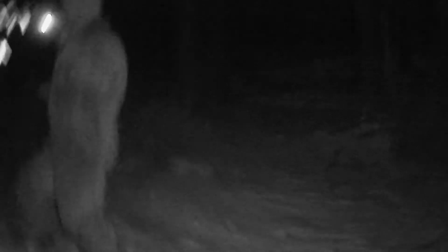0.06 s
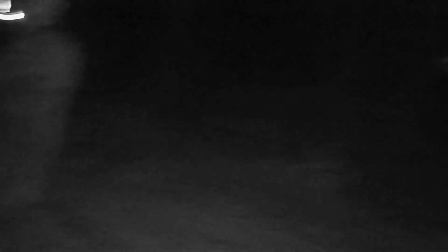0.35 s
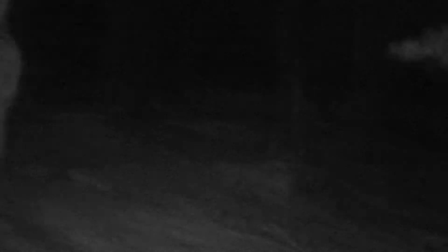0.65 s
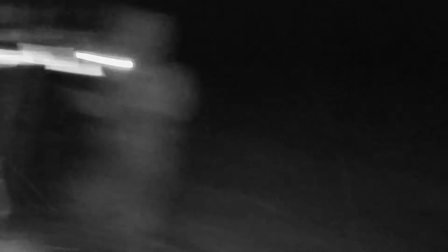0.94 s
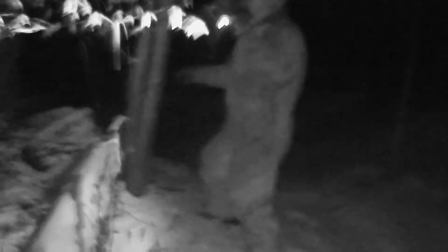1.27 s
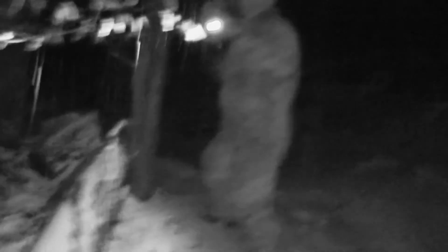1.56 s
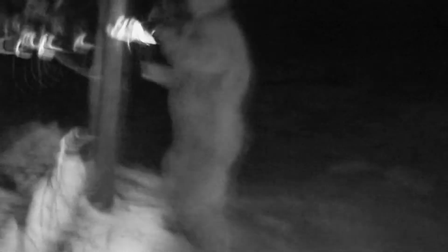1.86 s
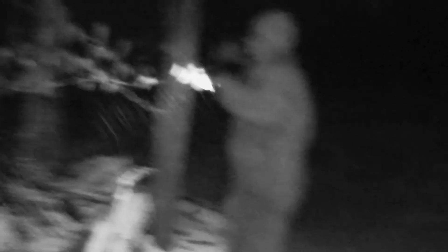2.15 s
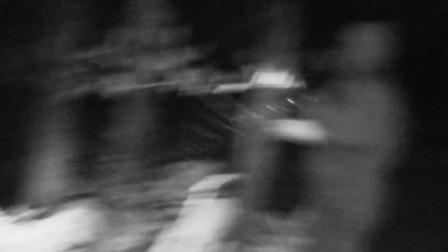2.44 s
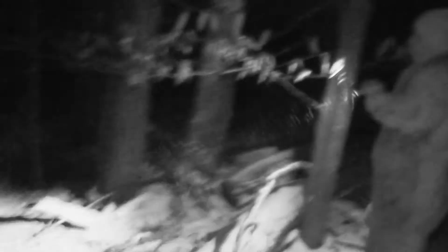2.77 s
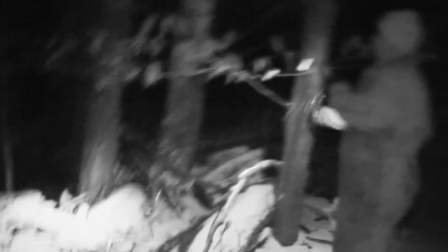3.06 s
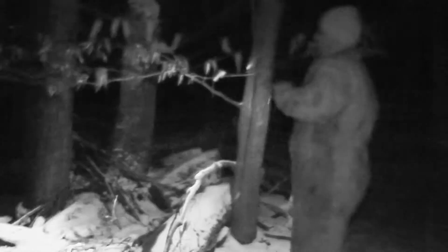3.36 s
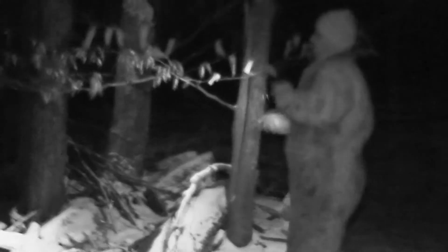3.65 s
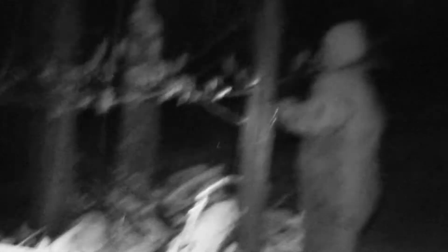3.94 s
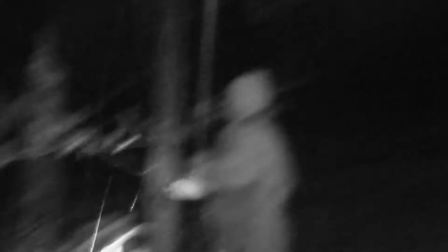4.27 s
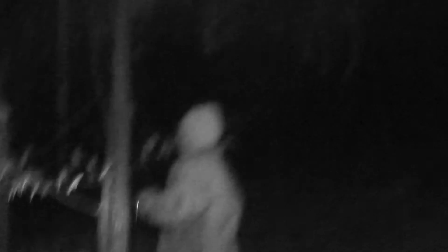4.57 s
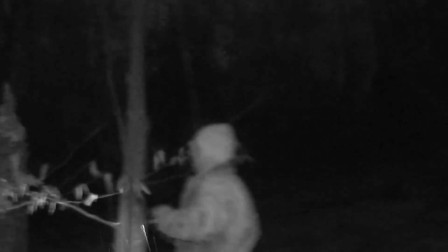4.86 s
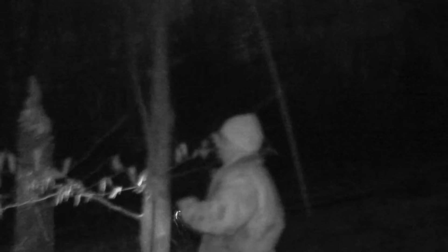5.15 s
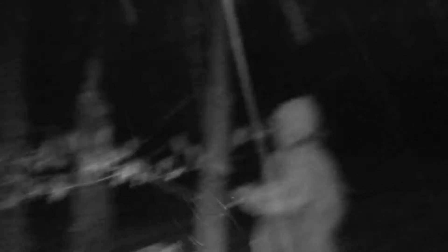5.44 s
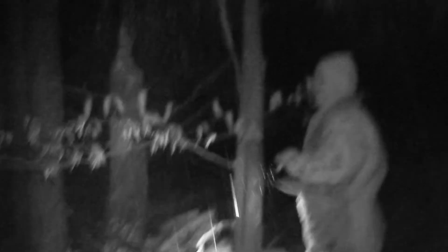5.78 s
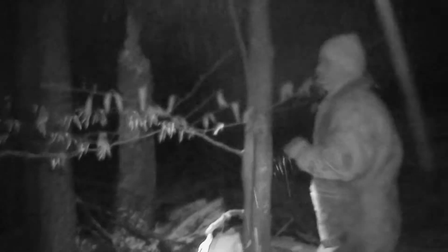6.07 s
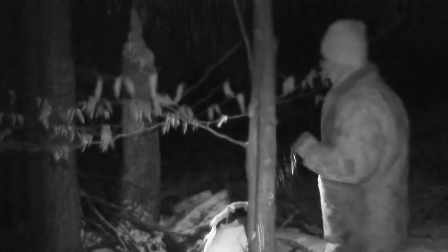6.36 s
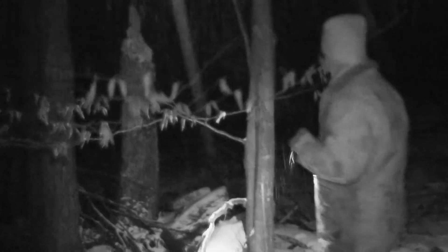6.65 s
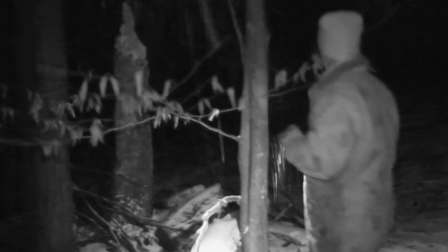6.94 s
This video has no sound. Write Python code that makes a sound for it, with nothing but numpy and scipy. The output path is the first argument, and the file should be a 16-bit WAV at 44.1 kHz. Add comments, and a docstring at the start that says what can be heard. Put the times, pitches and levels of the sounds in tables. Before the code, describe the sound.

A wooden stick knocks on a standing tree trunk nine times in a snowy wood. The blows start at about 0.4 seconds and come evenly, roughly every two thirds of a second, until 5.6 seconds. Each is a loud, sharp crack of wood and bark with a brief ring, slightly overloading the microphone, followed by a forest echo lasting about a second. During the first 2.5 seconds, loose pieces of wood clatter, winter clothes and snow rustle, and the hand on the microphone makes a low rumble and a few soft bumps. Twigs snap now and then, most clearly around 2 to 3 seconds, and the rustling thins after 3.5 seconds. From about 6 seconds to the end at 7, small bits patter down faintly with a few light snaps. A faint, distant low drone and hiss lie underneath. Everything is heard on the left.

```python
"""In a snowy wood at night, a wooden stick knocks nine times on a standing trunk.
Each blow cracks the bark and makes stick and trunk ring; the ground and the trees throw it back.
Winter clothes and snow rustle, twigs snap, bits of wood clatter down, and something far off drones low.
One hand-held microphone feeds the left channel and overloads on the knocks."""
import sys
import numpy as np
from scipy import signal
from scipy.fft import rfft, irfft, next_fast_len
from scipy.io import wavfile
from scipy.ndimage import map_coordinates

SR = 44100
rng = np.random.default_rng(int(sys.argv[2]) if len(sys.argv) > 2 else 0)


def to_wav(sig):
    """Store sig (one row per channel, or 1-D mono) as 16-bit WAV at the path in sys.argv[1].

    Samples outside -1..1 are clipped; the rate is SR.
    """
    pcm = np.clip(np.atleast_2d(sig), -1, 1) * 32767
    pcm = np.round(pcm).astype(np.int16)
    wavfile.write(sys.argv[1], SR, pcm.T)  # frames by channels


N = 313677

# Tone colours of the noises, from low to high pitch: (f/Hz, relative level/dB)
RUMBLE_COLOUR = [(10, 5.5), (30, 12), (50, 2), (90, -7.5), (160, -12.5), (300, -19.5), (800, -66.5)]
DRONE_COLOUR = [(60, -21.5), (130, -9.5), (220, -6.5), (290, 0), (345, -3), (420, -13), (600, -31.5),
                (1500, -64.5)]
HISS_COLOUR = [(100, -15.5), (500, 11.5), (1500, -0.5), (4000, -6.5), (8000, -16), (15000, -16)]
CLOTH_COLOUR = [(150, -2), (400, 5.5), (800, 2.5), (1500, 2), (3100, 2.5), (3800, -1), (6000, -2.5),
                (8500, -18), (12000, -17.5), (16000, -49.5)]
SNAP_COLOUR = [(300, 7.5), (1200, 8), (2600, 8), (5500, 4), (8000, -12), (12000, -13), (16000, -42)]
WOOD_COLOUR = [(60, -18.5), (150, -9.5), (400, -0.5), (800, 1.5), (1500, 5), (2200, -3), (2900, 3),
               (3600, -8.5), (6000, -19.5), (16000, -57)]  # the splintery body of a blow
BARK_COLOUR = [(500, -2), (2500, 10.5), (5000, 14.5), (8000, -9), (12000, -9), (16000, -24)]  # bark giving way
FOREST_COLOUR = [(100, -6.5), (300, -8), (480, -7), (700, 0), (1100, 4), (1900, 3), (3000, 2), (3500, -5),
                 (4400, -3), (6000, -13), (9000, -34), (16000, -18)]  # sound scattered by the trees
# How long each pitch lasts; t60 is the time it takes to fade by 60 dB: (f/Hz, t60/s)
WOOD_DECAY = [(100, 0.095), (700, 0.064), (1500, 0.064), (3000, 0.048), (8000, 0.046)]
FOREST_DECAY = [(200, 1.4), (800, 1.59), (1500, 1.27), (2800, 1.037), (5000, 0.76), (10000, 0.8)]
# How the handling rumble and the far drone rise and fall: (t/s, relative level/dB)
RUMBLE_LEVELS = [(0.0, -54), (0.83, -53), (1.15, -41), (1.52, -56), (2.22, -50), (3.27, -55.5), (3.6, -56),
                 (4.16, -59.5), (4.39, -58), (7.11, -59.5)]
DRONE_LEVELS = [(0.0, -60.5), (1.01, -50.5), (1.19, -54.5), (1.82, -54), (2.87, -62.5), (3.19, -52.5),
                (3.44, -60), (3.68, -61), (3.82, -57), (4.02, -58), (4.73, -61), (4.93, -47), (5.29, -53),
                (5.98, -45.5), (6.22, -49), (6.36, -51), (6.59, -53.5), (7.11, -47)]
# The hand shifts on the microphone: (t/s, level/dB, f/Hz)
HAND_BUMPS = [(1.051, -21.5, 76), (1.18, -26, 51.6), (1.526, -16.5, 76), (2.23, -28, 65.5)]
# Strokes of cloth and snow as the body moves: (t/s at the peak, level/dB, rise/s, fall/s)
CLOTH_STROKES = [(0.0, -32, 0.05, 0.1), (0.21, -37, 0.5, 0.33), (0.47, -32, 0.18, 0.17),
                 (0.875, -32, 0.13, 0.23), (1.06, -28, 0.063, 0.19), (1.305, -38, 0.016, 0.094),
                 (1.389, -35, 0.13, 0.081), (1.55, -45.5, 0.52, 0.74), (1.708, -24, 0.039, 0.13),
                 (1.86, -38, 0.18, 0.19), (2.15, -43.5, 0.06, 0.12), (2.294, -41.5, 0.009, 0.26),
                 (2.34, -35, 0.096, 0.88), (2.946, -38.5, 0.027, 0.015), (3.25, -48.5, 0.6, 0.15),
                 (3.524, -31, 0.036, 0.022), (4.23, -47.5, 0.35, 0.37), (6.08, -51.5, 0.38, 0.53),
                 (6.689, -52, 0.11, 0.5), (7.08, -55, 0.66, 0.13)]
# Twigs and snow crust snapping: (t/s, level/dB)
TWIG_SNAPS = [(0.023, -24), (0.2261, -26), (1.669, -30), (2.147, -17), (2.5316, -21), (2.8453, -31),
              (3.031, -21), (3.096, -30), (3.605, -32), (4.4494, -32), (6.8845, -28), (6.9766, -32.5),
              (7.0463, -32), (7.0772, -31)]
# The stick's rebound, loose wood landing, bumps and scuffs: (t/s, level/dB, f/Hz, t60/s, relative rasp/dB)
LIGHT_HITS = [(0.2616, -12, 955, 0.005, -15), (0.3858, -5.5, 1243, 0.03, 2),
              (0.4709, -9.5, 1176, 0.065, -5), (0.616, -19, 1145, 0.048, 0), (0.616, -20, 2880, 0.029, -22),
              (0.678, -10.5, 610, 0.0062, -3.5), (0.787, -24.5, 2130, 0.015, -6),
              (0.82, -24, 1116, 0.098, -5.5), (0.842, -15, 467, 0.047, -22), (0.848, -16, 672, 0.064, -23),
              (0.862, -17.5, 737, 0.036, -7.5), (1.058, -5.5, 2250, 0.0037, -8),
              (1.125, -8.5, 375, 0.022, -15), (1.338, -26.5, 1640, 0.015, 2),
              (1.674, -22.5, 380, 0.025, -18), (2.142, -11.5, 760, 0.0096, -7.5),
              (2.4265, -12, 646, 0.034, -4.5), (2.432, -15, 1413, 0.039, -12), (3.91, -26.5, 530, 0.02, -9),
              (6.24, -36, 720, 0.024, -10), (6.673, -34, 634, 0.023, -12)]
# Blows on the trunk: (t/s, force/dB, the stick's low note f/Hz, level/dB, its high note f/Hz, level/dB,
# crack level/dB, the trunk's main note f/Hz, thud level/dB); the levels are relative
BLOWS = [(0.3753, 3.5, 1210, -6.5, 2646, -1, 7, 870, -6.5), (1.122, -3.5, 1640, 1, 2127, 5, 0, 390, -2.5),
         (1.7285, 1, 1008, -7, 2940, -5, 2, 693, -2), (2.3738, 1.5, 1227, -4.5, 2700, 3.5, -3, 619, -2.5),
         (3.0428, 1, 1429, 2, 2770, -10, -9, 670, 1.5), (3.6815, 3, 1453, 0.5, 2842, 3, -11.5, 698, 2.5),
         (4.3444, 5, 1520, -2.5, 2718, 1, -1, 708, -3), (4.9932, 4, 1426, -7, 2750, 3.5, -4.5, 694, -1.5),
         (5.6436, 4, 1442, 2.5, 2690, 5, 0, 775, -2.5)]
# The other notes that ring in the struck trunk: (f/Hz, relative level/dB, t60/s)
TRUNK_NOTES = [(173, -20.5, 0.14), (205.4, -24.5, 0.18), (293.3, -16, 0.09), (405.4, -31, 0.24),
               (584, -28, 0.2), (1053, -11.5, .04), (1170, -8, 0.062), (1832, -2.5, 0.018),
               (3970, -3, 0.0092), (4860, -30.5, 0.016)]
# Echoes off the ground, then two trunks: (delay/s, level/dB, f/Hz above which the echo is dull)
NEAR_ECHOES = [(.0089, -14.5, 8980), (0.026, -22, 3500), (0.0321, -24.5, 3020)]


def amp(db):
    """Turn decibels into a gain."""
    return 10 ** (np.asarray(db) / 20)


def unit(x):
    """Scale a signal to an average (rms) level of 1."""
    return x / np.sqrt(np.mean(x ** 2) + 1e-20)


def at_pitch(points, hz):
    """Read a (f/Hz, value) table on a log frequency axis."""
    f, values = np.transpose(points)
    return np.interp(np.log(hz + 1), np.log(f + 1), values)


def over_time(points):
    """Read a (t/s, value) table at every sample."""
    times, values = np.transpose(points)
    return np.interp(np.arange(N) / SR, times, values)


def wobble(rate):
    """A smooth curve through `rate` random points a second."""
    points = rng.standard_normal(int(N * rate / SR) + 4)
    return map_coordinates(points, [np.arange(N) * rate / SR])


def filtered(x, response):
    """Scale and shift each frequency of x by response(hz)."""
    n = x.shape[-1]
    padded = next_fast_len(n + 8192)
    return irfft(rfft(x, padded) * response(np.fft.rfftfreq(padded, 1 / SR)), padded)[..., :n]


def noise(colour, size=N):
    """Noise with the given tone colour, at rms 1."""
    return unit(filtered(rng.standard_normal(size), lambda hz: amp(at_pitch(colour, hz))))


def fade(t, t60):
    """A fade that is 60 dB down after t60 seconds."""
    return np.exp(-np.log(1000) * t / t60)


def ring(t, hz, t60):
    """One pure note dying away."""
    return np.sin(2 * np.pi * hz * t) * fade(t, t60)


def dying_noise(colour, decay, size):
    """Noise in which each pitch dies at its own speed."""
    hz, t, bands = signal.stft(noise(colour, size), SR, nperseg=128)
    bands = bands * fade(t, at_pitch(decay, hz)[:, None])
    return signal.istft(bands, SR, nperseg=128)[1][:size]


def add(track, s, sound):
    """Mix a sound into the track, starting at s seconds."""
    part = track[max(round(s * SR), 0):][:len(sound)]
    part += sound[:len(part)]


def handling(gain_db=10.5):
    """The hand on the microphone makes an uneven rumble and a few soft bumps."""
    flutter = unit(amp(1.1 * wobble(12)))
    track = amp(over_time(RUMBLE_LEVELS) + gain_db) * flutter * noise(RUMBLE_COLOUR)
    t = np.arange(SR // 3) / SR
    for s, db, hz in HAND_BUMPS:
        add(track, s, amp(db) * ring(t, hz, t60=0.12) * (1 - np.exp(-t / 0.02)))
    return track


def far_drone(gain_db=9):
    """Something far off drones: low noise that wavers in level."""
    return amp(over_time(DRONE_LEVELS) + gain_db + 2.5 * wobble(16)) * noise(DRONE_COLOUR)


def movement(still_db=-67, swing_db=-46.5, swing_rise_s=0.13, swing_fall_s=0.28, depth_db=20):
    """How strongly cloth and snow are stirred: each stroke and arm swing swells and dies away."""
    t = np.arange(N) / SR
    swings = [(blow[0], swing_db, swing_rise_s, swing_fall_s) for blow in BLOWS]
    power = amp(still_db) ** 2
    for s, db, rise_s, fall_s in CLOTH_STROKES + swings:
        from_peak = np.maximum((s - t) / rise_s, (t - s) / fall_s)
        power = power + amp(db - depth_db * np.minimum(from_peak, 10)) ** 2
    return np.sqrt(power)


def rustle(stir):
    """Cloth slides and snow gives way in a fine, uneven grain."""
    grain = unit(amp(1.2 * wobble(40) + 2.8 * wobble(900)))
    return stir * grain * noise(CLOTH_COLOUR)


def crackle(stir, count=320, middle_hz=4200, range_db=11, dull_hz=7000):
    """Crumbs of bark and snow tick, each at its own pitch, and harder when there is more movement."""
    track, t = np.zeros(N), np.arange(SR // 50) / SR
    for when, size, pitch in rng.random(size=(count, 3)):
        hz = middle_hz * np.exp(pitch - 0.5)
        tick = ring(t, hz, t60=0.0046) + 0.5 * rng.standard_normal(len(t)) * fade(t, t60=0.01)
        strength = amp(-52) + amp(-2) * stir[int(when * N)]
        add(track, when * N / SR, strength * amp(range_db * size ** 2) * tick)
    return filtered(track, lambda f: 1 / np.hypot(1, (f / dull_hz) ** 2))


def snaps(bit_count=16, bits_from_s=5.95, bit_db=-39.5, spread_db=1.5):
    """Twigs and snow crust snap; after the last blow, bits shaken loose patter down faintly."""
    track, t = np.zeros(N), np.arange(SR // 20) / SR
    gap_s = (N / SR - bits_from_s) / bit_count
    bits = [(bits_from_s + (k + rng.random()) * gap_s, bit_db - spread_db * rng.standard_normal())
            for k in range(bit_count)]
    for s, db in TWIG_SNAPS + bits:
        add(track, s, amp(db) * noise(SNAP_COLOUR, len(t)) * fade(t, t60=0.015))
    return track


def clatter(wash_db=-22):
    """Light hits: each is one woody note with a rasp that dies with it, and the trees answer faintly."""
    track, t = np.zeros(N), np.arange(SR // 5) / SR
    for s, db, hz, t60, rasp_db in LIGHT_HITS:
        rasp = amp(rasp_db) * noise(WOOD_COLOUR, len(t)) * fade(t, t60)
        add(track, s, amp(db) * (ring(t, hz, t60) + rasp) * (1 - np.exp(-t / 0.00017)))
    wash = forest_wash([], dull_hz=4500)
    return track + amp(wash_db) * signal.fftconvolve(track, wash / np.linalg.norm(wash))[:N]


def forest_wash(notes, dull_hz, width=0.084, lift_db=7):
    """Countless trunks scatter a hit into a smooth wash, coloured by its (f/Hz, level/dB) notes."""
    def colour(f):
        peaks = sum(amp(db + lift_db) ** 2 / (1 + ((f / hz - 1) / width) ** 2) ** 2 for hz, db in notes)
        return np.sqrt((1 + peaks) / (1 + (f / dull_hz) ** 6))

    t = np.arange(SR * 3 // 2) / SR
    onset = 1 - np.exp(-t / 0.0047)
    swell = 1 + 0.42 * np.exp(-((t - 0.1) / 0.045) ** 2)  # the sound reaches the surrounding trees
    return filtered(dying_noise(FOREST_COLOUR, FOREST_DECAY, len(t)), colour) * onset * swell


def knocks(high_loss_db=3.5):
    """Each blow cracks the bark, thuds in the trunk and rings the stick."""
    track, t = np.zeros(N), np.arange(SR // 5) / SR
    onset = 1 - np.exp(-t / 0.00055)
    for s, force_db, low_hz, low_db, high_hz, high_db, crack_db, trunk_hz, thud_db in BLOWS:
        # the stick's pitch depends on the grip and on where it hits
        stick = amp(low_db) * ring(t, low_hz, t60=0.045) + amp(high_db) * ring(t, high_hz, t60=0.023)
        trunk = amp(-8.5) * ring(t, trunk_hz, t60=0.061)
        for hz, db, t60 in TRUNK_NOTES:
            strength = amp(db + rng.normal(0, 0.37)) * rng.choice([-1, 1])
            trunk += strength * ring(t, hz * rng.normal(1, 0.005), t60)
        splinters = amp(-3) * dying_noise(WOOD_COLOUR, WOOD_DECAY, len(t))
        crack = amp(crack_db) * noise(BARK_COLOUR, len(t)) * fade(t, t60=0.013)
        blow = amp(force_db) * (stick + splinters + crack) + amp(thud_db) * trunk
        add(track, s, with_echoes(blow * onset))
        # the stick's high note carries less well among the trees
        carried_notes = [(low_hz, low_db), (high_hz, high_db - high_loss_db)]
        # a harder blow draws a brighter and louder answer from the forest
        wash = forest_wash(carried_notes, dull_hz=3800 * 2 ** (0.25 * force_db))
        add(track, s, amp(-30 + 0.66 * force_db) * wash)
    return track


def with_echoes(sound, spread=0.05):
    """The ground and two trunks throw a sound back; the delays vary a little as the microphone moves."""
    stretch = 1 + spread * rng.standard_normal()

    def echoes(f):
        return sum(amp(db) * np.exp(-2j * np.pi * f * delay_s * stretch) / (1 + 1j * f / dull_hz)
                   for delay_s, db, dull_hz in NEAR_ECHOES)

    return filtered(sound, lambda f: 1 + echoes(f))


def scene():
    """All the sounds and a steady hiss go to the left channel; the right carries only a trace."""
    stir = movement()
    background = handling() + far_drone() + amp(-57.5) * noise(HISS_COLOUR)
    sound = background + rustle(stir) + crackle(stir) + snaps() + clatter() + knocks()
    return np.array([sound, amp(-60.5) * sound])


def record(dry, left_ceiling=0.69, hardness=6, top_hz=16100):
    """The overloaded input flattens peaks, both channels hiss faintly, and the top treble is cut off."""
    ceiling = left_ceiling * amp([[0], [-57]])
    clipped = dry / (1 + np.abs(dry / ceiling) ** hardness) ** (1 / hardness)
    hiss = amp([[-90], [-86]]) * noise(HISS_COLOUR)
    return filtered(clipped + hiss, lambda hz: 1 / (1 + (hz / top_hz) ** 100))


dry = scene()
out = record(dry)
to_wav(out)
```